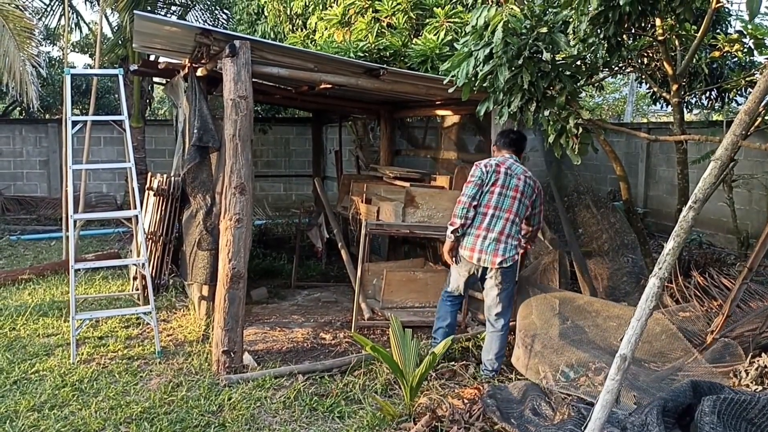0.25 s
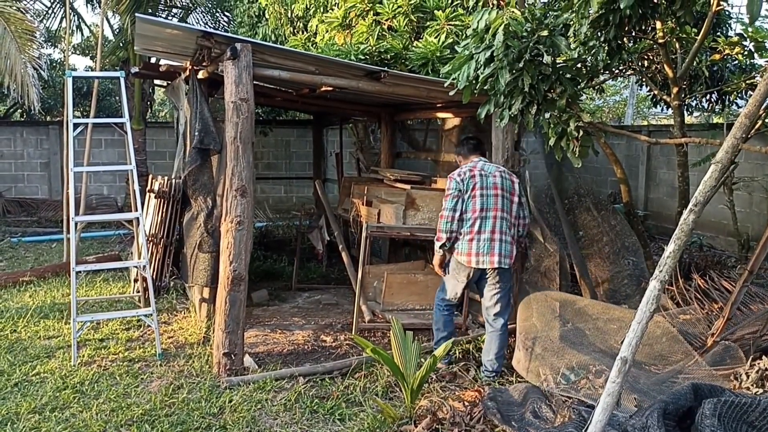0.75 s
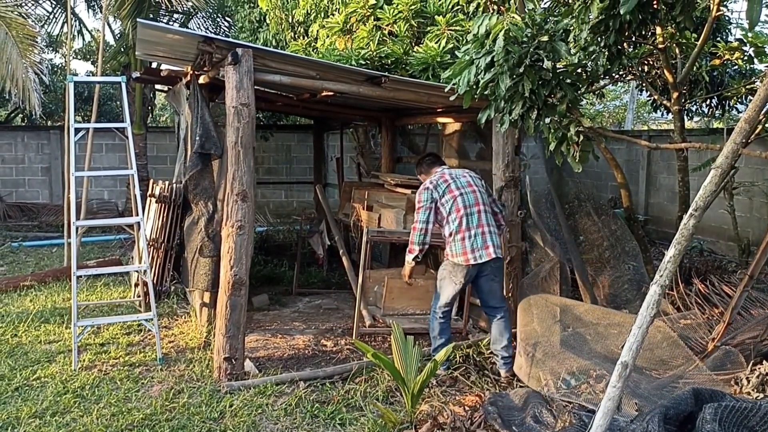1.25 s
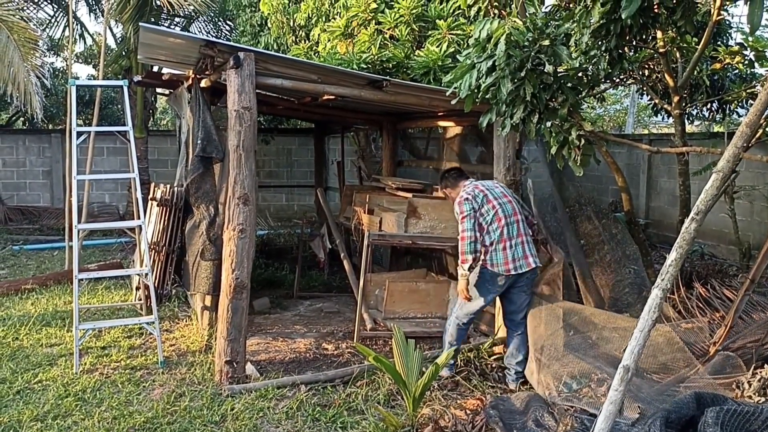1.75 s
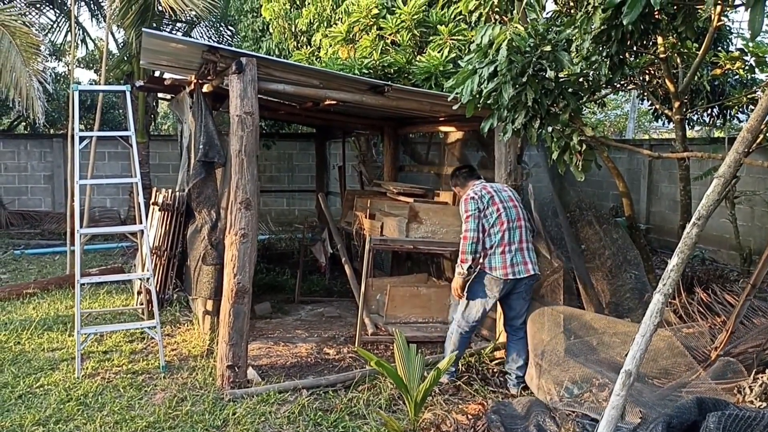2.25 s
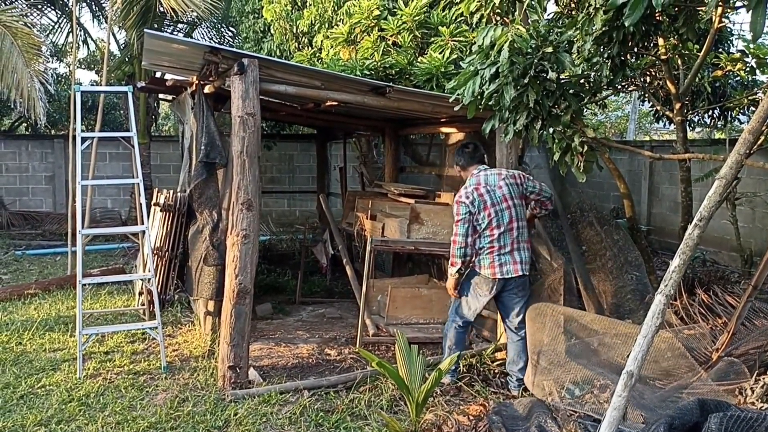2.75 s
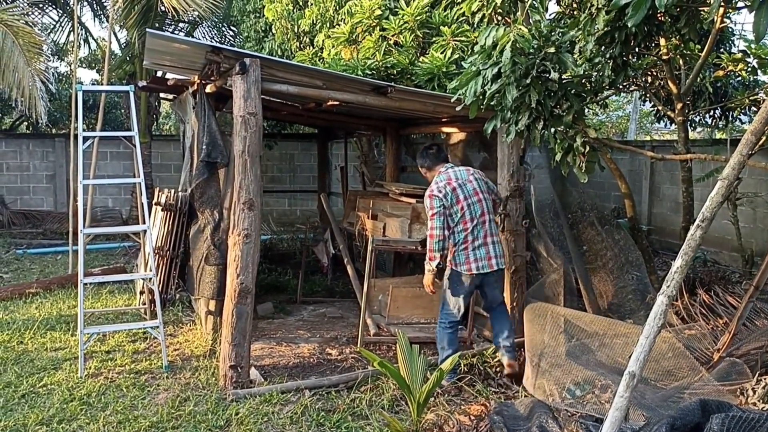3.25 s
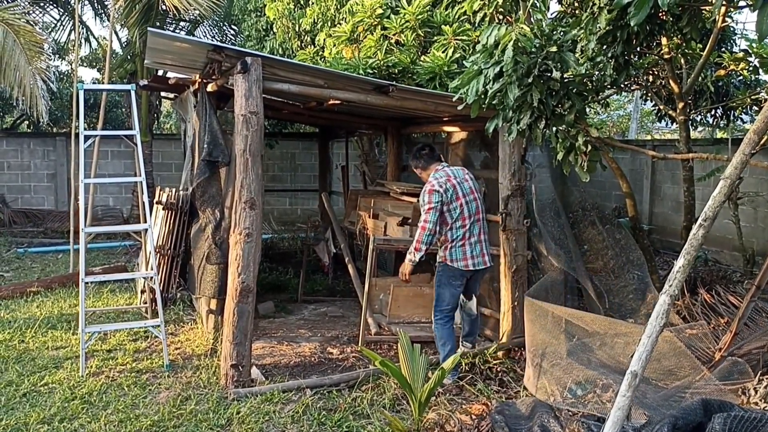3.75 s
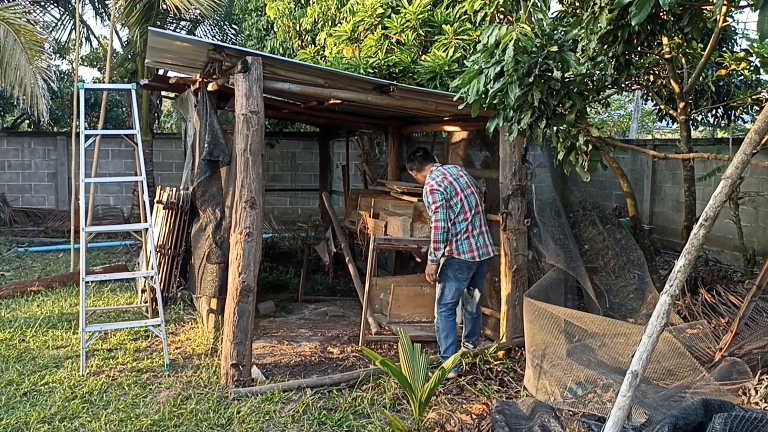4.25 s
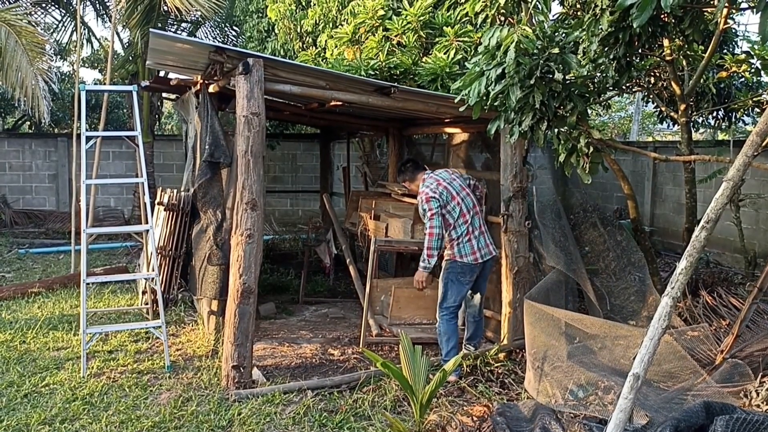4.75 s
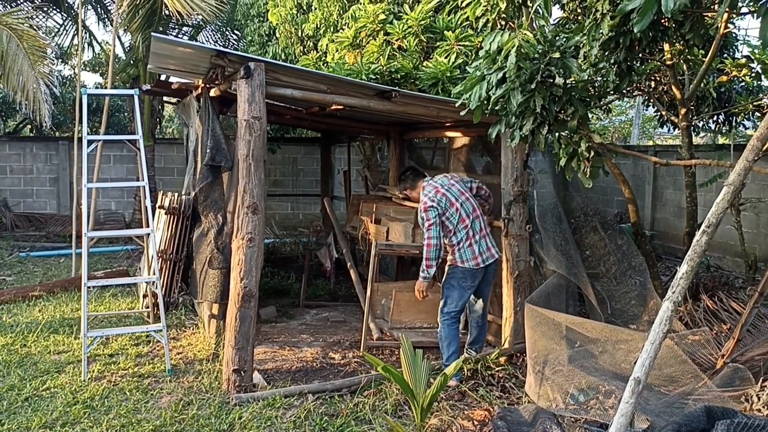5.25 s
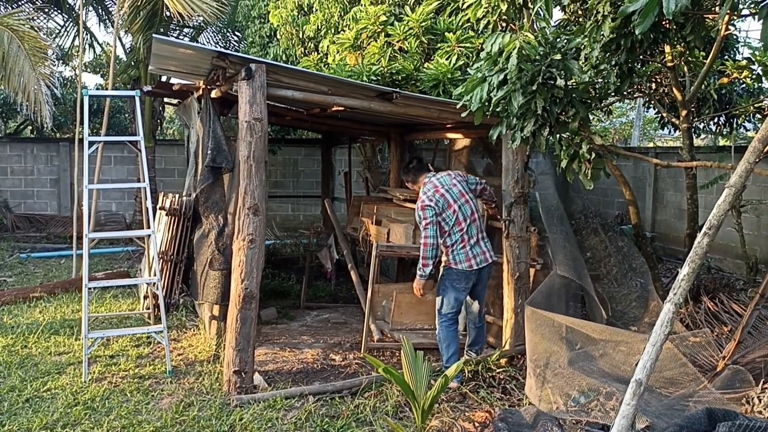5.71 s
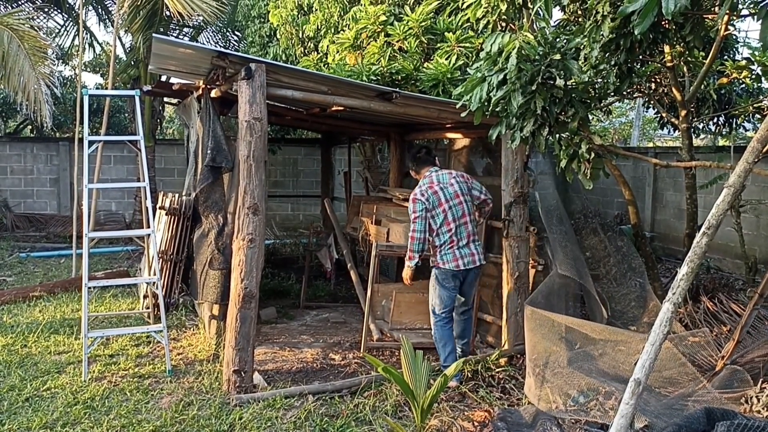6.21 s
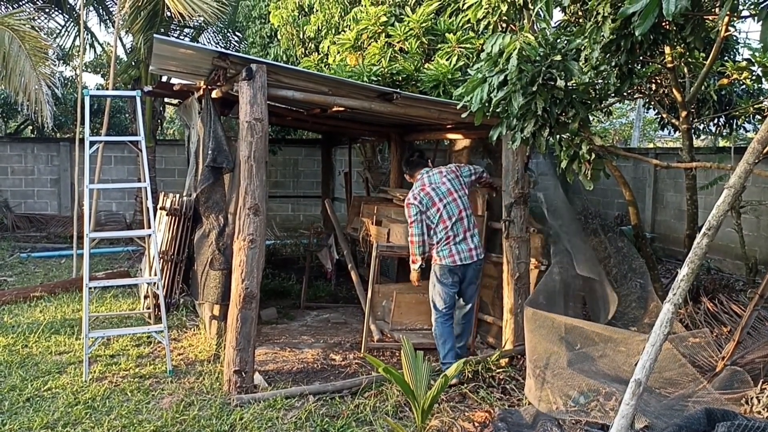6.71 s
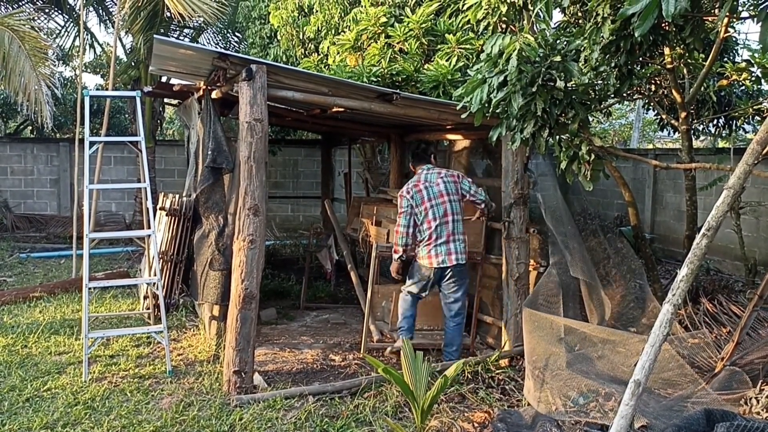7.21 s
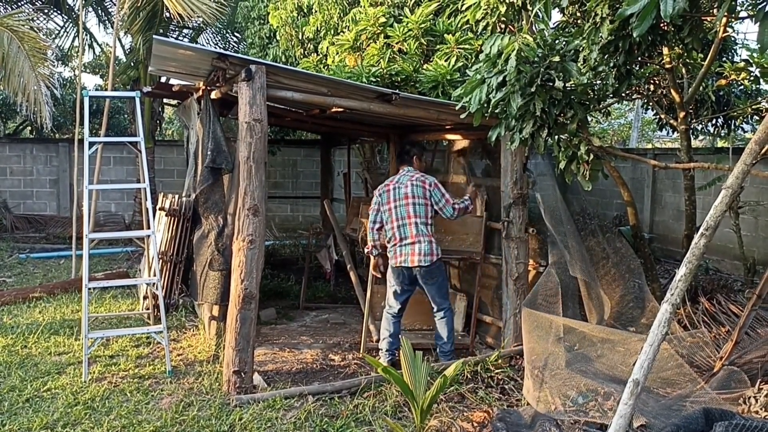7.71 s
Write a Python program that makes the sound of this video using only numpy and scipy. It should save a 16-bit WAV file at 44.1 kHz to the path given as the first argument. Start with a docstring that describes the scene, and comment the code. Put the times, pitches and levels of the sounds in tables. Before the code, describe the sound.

In a quiet garden, a hard wooden blow cracks under a low sheet roof, then feet and netting scrape through dry leaves with snapping stalks. A second blow follows, more rustling, then four more knocks in the later part, loose boards bouncing and clattering after them. A bird trills on the right from two seconds. Faint insects and fading distant traffic lie underneath, heard from a few metres away in stereo.

```python
"""Garden air, insects and ebbing far traffic (filtered noise) run throughout; one vehicle stands out at the start.
From 0.3 s to 6.7 s six hard blows knock an old wooden coop apart under a low sheet roof: noise cracks,
decaying modes and shed echoes, with loose boards clattering after them.
Between the blows feet and netting scrape through dry leaves (noise grains), and stalks snap.
From 2 s a bird calls on the right (trilled sines). A phone with two microphone ports stands a few metres off."""
import sys
import numpy as np
from scipy import signal
from scipy.fft import rfft, irfft, next_fast_len
from scipy.io import wavfile
from scipy.ndimage import uniform_filter1d

SR = 44100
rng = np.random.default_rng(int(sys.argv[2]) if len(sys.argv) > 2 else 0)


def log_audio(samples):
    """Write samples as a 16-bit WAV file to the path given in sys.argv[1]."""
    # one column per channel
    frames = np.atleast_2d(samples).T
    # limit to full scale, then quantise
    limited = np.clip(frames, -1, 1)
    pcm = np.round(limited * 32767).astype(np.int16)
    wavfile.write(sys.argv[1], SR, pcm)


N = 351477
T = np.arange(N) / SR
RING = T[:SR]  # time axis of one decay, 1 s long


def undb(db):
    """Decibels to amplitude gain."""
    return 10 ** (np.asarray(db) / 20)


def unit(x):
    """Scale to rms 1."""
    return x / np.sqrt(np.mean(x ** 2))


def fade(t60_s):
    """Exponential decay, 60 dB down after t60_s."""
    return np.exp(-np.log(1000) * RING / t60_s)


def sides(left_minus_right_db):
    """Left and right gains for a level difference."""
    return undb(np.array([[left_minus_right_db], [-left_minus_right_db]]) / 2)


def add(out, start_s, x):
    """Mix x into out from start_s, cut at the end of out."""
    i = int(start_s * SR)
    out[:, i:i + x.shape[-1]] += x[..., :N - i]


def colour(x, points, keep_power=False):
    """Minimum-phase filter through (f/Hz, gain/dB) points; keep_power sets the gain's rms to 1."""
    n = next_fast_len(x.shape[-1] + SR // 20, True)
    hz, db = np.transpose(points)
    log_hz = np.log(np.fft.rfftfreq(n, 1 / SR) + 1)  # +1 avoids log(0)
    gain = undb(np.interp(log_hz, np.log(hz), db))
    if keep_power:
        gain = unit(gain)
    # fold the cepstrum onto positive time: causal response
    cepstrum = irfft(np.log(gain), n)
    cepstrum[1:n // 2] *= 2
    cepstrum[n // 2 + 1:] = 0
    response = np.exp(rfft(cepstrum))
    return irfft(rfft(x, n) * response, n)[..., :x.shape[-1]]


def diffuse(size):
    """Noise from all around: the two ports share mainly the bass."""
    port_gap_m, sound_m_per_s = 0.13, 343
    alike = np.sinc(2 * np.fft.rfftfreq(size, 1 / SR) * port_gap_m / sound_m_per_s) * .97
    spectra = rfft(rng.standard_normal((2, size)))
    mid, side = spectra * np.sqrt([(1 + alike) / 2, (1 - alike) / 2])
    return irfft(np.array([mid + side, mid - side]), size)


def walk(rate_hz, size=N):
    """Random wandering: smoothed random steps at rate_hz, rms near 1."""
    k = int(SR / rate_hz)
    steps = np.repeat(rng.standard_normal(size // k + 1), k)
    return unit(uniform_filter1d(steps, k)[:size])


def garden(insect_db=-73, air_db=-60, wander_db=1.33):
    """Still air, the drone of far traffic and a thin band of insects, each as wandering filtered noise."""
    # air spectrum: f/Hz, density/dB per Hz (relative)
    air_spectrum = [(18, -66), (30, -39), (56, -10), (93, -6), (199, -5), (239, -12.5), (266, -8.5),
                    (394, -11), (499, -15.5), (780, -15.5), (1810, -22), (2120, -15.5), (8980, -30.5),
                    (12000, -28), (16000, -36)]
    air = colour(diffuse(N), air_spectrum, True) * undb(air_db + 0.45 * walk(1.3))

    traffic_db, ebb_db_per_s = -60, -0.69
    vehicle_s, vehicle_width_s, vehicle_db = .24, .24, 6.5
    drone_spectrum = [(45, -35.0), (80, 0), (100, 3), (140, -3), (250, -13.0), (600, -26), (2000, -51.0)]
    drone = colour(diffuse(N), drone_spectrum, True)
    vehicle = np.exp(-((T - vehicle_s) / vehicle_width_s) ** 2)
    drone_db = traffic_db + ebb_db_per_s * T + vehicle_db * vehicle + wander_db * walk(4)

    insect_spectrum = [(8000, -32.0), (9500, 0), (10000, 8.5), (10500, -9.0), (12000, -42.5)]
    insects = colour(diffuse(N), insect_spectrum, True) * undb(insect_db + 1.2 * walk(9.3))
    return air + drone * undb(drone_db) + insects


def note(length_s, first_hz, last_hz, depth_hz=25, trill_hz=105, slur=6.98, rough=0.45, octave_db=-30,
         rounding=0.31):
    """One whistled note: the pitch slides quickly towards its final value, with an uneven trill."""
    t = T[:int(length_s * SR)]
    trill = np.sin(2 * np.pi * trill_hz * t) + rough * walk(400, size=SR)[:len(t)]
    slide_hz = (first_hz - last_hz) * np.exp(-slur * t / length_s)
    hz = last_hz + slide_hz + depth_hz * trill
    phase = 2 * np.pi * np.cumsum(hz) / SR
    envelope = np.sin(np.pi * t / length_s) ** rounding
    return envelope * (np.sin(phase) + undb(octave_db) * np.sin(2 * phase))


def bird(pan_db=-5, trees_db=-3, trees_t60_s=0.79):
    """Slur-and-buzz phrases, higher buzzes and lone slurs, scattered by the trees as decaying noise."""
    # phrases, a lead-in slur into a low buzz: t/s, buzz level/dB, buzz final f/Hz
    phrases = [(3.566, -50, 2560), (4.443, -51, 2444), (5.306, -49.5, 2494), (6.19, -50, 2577),
               (7.885, -59, 2710)]
    # higher buzzes: t/s, length/s, final f/Hz, trill depth/Hz, level/dB
    high_buzzes = [(2.571, .06, 3880, 403, -58.5), (2.688, .074, 3310, 230, -53.5),
                   (4.638, 0.089, 3330, 300, -56), (4.977, 0.23, 2876, 145, -52),
                   (5.817, 0.22, 2930, 140, -52), (6.623, 0.15, 3360, 290, -62),
                   (7.783, 0.057, 3150, 140, -65.5)]
    # lone slurs: t/s, length/s, first f/Hz, last f/Hz, level/dB
    lone_slurs = [(2.047, 0.0085, 3650, 3380, -41), (2.06, .023, 2320, 2247, -49.5),
                  (2.775, 0.043, 3090, 2410, -60.5), (3.155, .055, 2410, 2585, -59),
                  (3.196, .056, 2733, 3225, -55), (3.957, .036, 4550, 2453, -46),
                  (5.718, 0.029, 3500, 2520, -48.5)]
    lead_s, lead_first_hz, lead_last_hz, lead_depth_hz, lead_db = .028, 3830, 3220, 70, -3
    buzz_after_s, buzz_s, buzz_depth_hz = 0.017, 0.212, 218
    buzz_start = 1.019  # initial pitch over final pitch
    out = np.zeros((2, N))
    for s, db, hz in phrases:
        lead = note(lead_s, lead_first_hz, lead_last_hz, lead_depth_hz)
        add(out, s, undb(db + lead_db) * lead)
        add(out, s + buzz_after_s, undb(db) * note(buzz_s, hz * buzz_start, hz, buzz_depth_hz))
    for s, length_s, hz, depth_hz, db in high_buzzes:
        add(out, s, undb(db) * note(length_s, hz * buzz_start, hz, depth_hz))
    for s, length_s, first_hz, last_hz, db in lone_slurs:
        add(out, s, undb(db) * note(length_s, first_hz, last_hz))
    trees = unit(diffuse(SR) * fade(trees_t60_s)) / np.sqrt(SR)
    scattered = signal.fftconvolve(out, trees, axes=1)[:, :N]
    return (out + undb(trees_db) * scattered) * sides(pan_db)


def dragging(rest_db=-74):
    """Amplitude of the drags: each swells, holds and dies away above a constant floor."""
    # drags: t/s, attack e-fold/s, hold/s, level/dB, release e-fold/s
    drags = [(0.654, .08, 0.16, -63, 0.3), (1.428, 0.13, .17, -48, 0.11), (2.217, 0.055, 0.12, -50, 0.045),
             (2.45, 0.23, 0.06, -62.5, .1), (3.235, 0.035, .03, -54, .045), (3.367, 0.048, .05, -50, .065),
             (4.483, 0.17, 0.31, -64, .15), (5.246, 0.24, 0.074, -65, .15),
             (5.842, 0.29, 0.15, -54.5, 0.27), (7.253, 0.14, .12, -63, 0.21)]
    power = undb(rest_db) ** 2
    for s, attack_s, hold_s, db, release_s in drags:
        away = np.maximum((s - T) / attack_s, (T - s - hold_s) / release_s)
        power = power + (undb(db) * np.exp(-np.maximum(away, 0))) ** 2
    return np.sqrt(power)


def leaves(grains_per_s=2000, spread_db=3.5, scrape_db=5, jerk_db=2.3, echo_db=2, snap_echo_db=-17):
    """Dry leaves crackle in dense tiny grains under jerky drags; stalks and twigs snap as noise bursts."""
    # leaf spectrum: f/Hz, density/dB per Hz (relative)
    leaf_spectrum = [(200, -21.5), (450, -11), (850, -6), (1700, -5.5), (3300, 1), (4300, -2), (5300, -9.5),
                     (7000, -6.5), (8800, -11), (11000, -9.5), (12500, -4), (16000, -15)]
    # louder stalk snaps: t/s, level/dB
    stalks = [(0.886, -46), (1.337, -36), (1.453, -32), (1.500, -36), (1.581, -46), (1.629, -30.5),
              (1.667, -37), (2.216, -40), (2.520, -49), (3.216, -45), (3.262, -40.5)]
    drag = dragging()
    effort = drag * undb(scrape_db + jerk_db * walk(45))
    hits = rng.random(N) < grains_per_s / SR
    strength = undb(spread_db * np.minimum(rng.exponential(size=N), 4))
    grains = hits * strength * rng.choice([-1, 1], N)
    crackle = grains * diffuse(N)  # own strength at each port
    echo = signal.fftconvolve(grains[None], diffuse(SR) * fade(0.17), axes=1)[:, :N]
    out = effort * unit(unit(crackle) + undb(echo_db) * unit(echo))

    twigs_per_s, twig_db = 6, 7.5  # random times, level above the drag
    at = rng.integers(0, N, int(twigs_per_s * N / SR))
    twigs = np.column_stack([T[at], 20 * np.log10(drag[at]) + twig_db])
    for s, db in [*stalks, *twigs]:
        decay = fade(.025) + undb(snap_echo_db) * fade(0.14)
        add(out, s, undb(db) * diffuse(SR) * decay)
    return colour(out, leaf_spectrum, True)


def ring(modes, detune=.004, scatter_db=2, apart_hz=1400):
    """Decaying modes, varied in pitch and level per contact; high ones reach the ports out of step."""
    out = 0
    draws = rng.standard_normal((len(modes), 4))
    for (hz, db, t60_s), (pitch, level, start, split) in zip(modes, draws):
        port_split = np.array([[split], [-split]]) * min(hz / apart_hz, 1) ** 2 / 2
        phase = np.pi * start + port_split
        wave = np.sin(2 * np.pi * hz * (1 + detune * pitch) * RING + phase)
        out = out + undb(db + scatter_db * level) * fade(t60_s) * wave
    return out


def shed_tail(low_t60_s=0.73, mid_t60_s=0.41, high_t60_s=0.35, build_s=0.0031, rattle_db=2.0):
    """Loose boards chatter and echo between roof, posts and wall; the lows stay longest."""
    noise = diffuse(SR)
    low = signal.sosfiltfilt(signal.butter(2, 350, fs=SR, output="sos"), noise)
    high = signal.sosfiltfilt(signal.butter(2, 4500, "high", fs=SR, output="sos"), noise)
    chatter = (noise - low - high) * undb(rattle_db * walk(129.3, size=SR))
    tail = low * fade(low_t60_s) + chatter * fade(mid_t60_s) + high * fade(high_t60_s)
    return tail * (1 - np.exp(-RING / build_s))


def knock(boom_db, body_db, top_db, pan_db, tick=10, crack_t60_s=0.13, direct=1.15, shed_db=-3,
          frame_db=-13, panel_db=-11, swell_s=0.032, sway=0.5):
    """One contact: a tick and crunch of wood, the frame's modes, the panels' late boom, the shed's echoes."""
    # modes of frame and boards: f/Hz, level/dB, t60/s
    frame_modes = [(605.6, 6, 0.06), (687.4, 4.5, 0.12), (793.3, -5, 0.29), (975, -27.5, 0.24),
                   (1040, -25.5, 0.14), (1242, -2.5, 0.29), (1517, -3, 0.16), (1803, -12.5, 0.1),
                   (1837, -1, 0.13), (2180, -10.5, 0.24), (2244, -11, 0.66), (2470, -18, 0.26),
                   (2590, -3.5, 0.034), (2710, -21, 0.41), (3005, -13.5, 0.25), (2990, -23.5, 0.11),
                   (3400, -11, 0.45), (3340, 4, 0.198), (3490, -7.5, 0.5), (3900, -20, 0.16),
                   (4300, -24.5, 0.18), (6600, -29, .15)]
    # modes of the thin wall panels: f/Hz, level/dB, t60/s
    panel_modes = [(137.4, -6, 0.46), (165, -11, 0.52), (208.4, -4, .5), (224.7, 0, 0.51), (247.3, -9, .42),
                   (291, -13.5, 0.32)]
    # crack and shed spectra: f/Hz, density/dB per Hz (relative)
    crack_spectrum = [(60, -20), (130, -9), (260, -7), (450, -12), (650, -7.5), (950, -5), (1700, -3.5),
                      (2400, -6), (3400, -6), (4000, -11.5), (5500, -25), (8500, -33), (12500, -26.5),
                      (16000, -35.5)]
    shed_spectrum = [(50, -20), (120, -1.5), (230, 1.5), (330, -0.5), (480, -7.5), (680, -4), (1000, -7),
                     (1700, 1.5), (3200, 1.5), (4000, -6), (6500, -11.5), (8500, -16.5), (12500, -15),
                     (16000, -22)]
    crunch = direct * rng.standard_normal(SR) * fade(0.036)  # direct sound, equal at both ports
    crunch[0] += tick
    contact = colour(crunch + diffuse(SR) * fade(crack_t60_s), crack_spectrum, True)
    # the phone's body shades one port only above the bass
    crack = np.array([colour(x, [(400, 0.055), (1200, sign * pan_db / 2)])
                      for x, sign in zip(contact, (1, -1))])
    # heavy blows shake the panels up slowly
    panels = ring(panel_modes, detune=0.0088) * (1 - np.exp(-RING / swell_s))
    sound = crack + undb(frame_db) * ring(frame_modes)
    sound = sound + undb(panel_db + sway * min(boom_db, 3)) * panels
    sound = sound + undb(shed_db) * colour(shed_tail(), shed_spectrum, True)
    # place and hardness of the contact set the balance
    balance = [(30, -11), (110, boom_db), (240, boom_db), (450, 0.5 * (boom_db + body_db) - 1.5),
               (650, body_db), (1200, 0.49 * body_db), (2800, -1), (5500, top_db), (13000, 1.75 * top_db)]
    return colour(sound, balance)


def clack(boom_db, body_db, top_db):
    """The lighter, drier knock of a loose board."""
    return knock(boom_db, body_db, top_db, pan_db=0.5, tick=5.1, crack_t60_s=0.088, direct=1.0,
                 shed_db=-7, frame_db=-19.5, panel_db=-13.5)


def coop(second_db=-3, bounces=3, piece_t60_s=.17):
    """Blows ring two modes of the struck piece; its loosened board recoils and bounces; other boards clack."""
    # blows: t/s, level/dB, hollow boom/dB, board body/dB, splintery top/dB,
    #   struck piece: first mode f/Hz, second mode f/Hz, level/dB; left minus right/dB,
    #   loosened board: recoil delay/s, recoil level/dB, bounce gap/s, first bounce level/dB, boom/dB, body/dB
    blows = [(0.3237, -19, -9.5, -7.5, -3.5, 1717, 2176, -4, -6, .0048, -16, 0.055, -41, -6.5, -1),
             (1.8105, -18, -6, -3.5, 3, 3520, 1348, -7.5, 2.5, .0048, -9, 0.051, -23, -14.5, -23),
             (4.112, -14.5, -13, -4, -2.5, 1657, 3340, -16, 8, 0.0068, -15.5, .047, -20, 1.5, 4.5),
             (4.7557, -15.5, -2.5, 4.5, -2.5, 1890, 2256, -6.5, 3.5, .012, -24.5, .049, -23, 3, 3),
             (5.4196, -19.5, -1.5, 4.5, 2, 647, 2520, -8, 2, 0.026, -21.5, .049, -24, -4, -19.5),
             (6.7064, -15, -10.5, 2, 2.5, 714, 3025, -11, 4, 0.022, -23.5, 0.061, -43, -14, -18)]
    # boards dropped or handled: t/s, level/dB, hollow boom/dB, board body/dB, splintery top/dB
    boards = [(0.757, -46, -7, -4, -8), (4.883, -30.5, 8, 15, -20), (4.912, -54, 17, 4, -8),
              (5.586, -45.5, 14.5, 21, -6), (5.855, -51, -4, 3, 7), (6.182, -49, -5, -6, 3),
              (6.893, -34, -3, -0.5, -1.5), (7.1, -52, -7, -21, 5.5), (7.217, -46, -20, 0, 1),
              (7.245, -48, -9.5, -7, 1), (7.299, -48, -18, -15, 0), (7.521, -52, -11, -27, 5)]
    # even bounces, each weaker, softer and hollower
    loss_db, boom_step_db, body_step_db, top_step_db = 10.5, 3.5, 2.5, -3
    out = np.zeros((2, N))
    for (s, db, boom_db, body_db, top_db, first_hz, second_hz, ring_db, pan_db,
         recoil_s, recoil_db, gap_s, bounce_db, loose_boom_db, loose_body_db) in blows:
        first = np.sin(2 * np.pi * first_hz * RING)
        second = undb(second_db) * np.sin(2 * np.pi * second_hz * RING)
        piece = fade(piece_t60_s) * (first + second)
        blow = knock(boom_db, body_db, top_db, pan_db) + undb(ring_db) * piece
        add(out, s, undb(db) * blow)
        add(out, s + recoil_s, undb(recoil_db) * clack(loose_boom_db, loose_body_db, top_db))
        for k in range(1, bounces + 1):
            bounce = clack(loose_boom_db + k * boom_step_db, loose_body_db + k * body_step_db,
                           top_db + k * top_step_db)
            add(out, s + k * gap_s, undb(bounce_db - (k - 1) * loss_db) * bounce)
    for s, db, boom_db, body_db, top_db in boards:
        add(out, s, undb(db) * clack(boom_db, body_db, top_db))
    return out


def scene():
    """The work on the coop within the garden."""
    return garden() + bird() + leaves() + coop()


def record(dry):
    """Each port has its own colour; the phone rounds the highest peaks and cuts the top."""
    # port colour difference: f/Hz, left minus right/dB
    ports = [(200, 0.9), (900, -0.7), (1600, -0.5), (3000, -11), (4500, -1), (7000, -9.5), (9500, -0.5),
             (13000, 7.5)]
    top_hz = 16200
    heard = np.array([colour(x, [(hz, sign * db / 2) for hz, db in ports])
                      for x, sign in zip(dry, (1, -1))])
    low_pass = signal.ellip(10, .2, 80, top_hz, fs=SR, output="sos")
    return signal.sosfilt(low_pass, np.tanh(heard))


dry = scene()
out = record(dry)
log_audio(out)
```